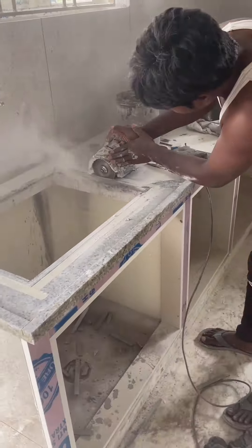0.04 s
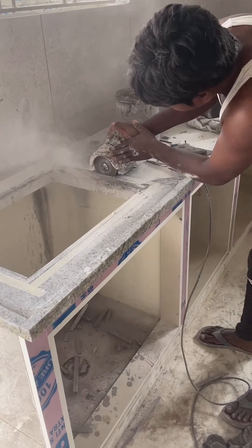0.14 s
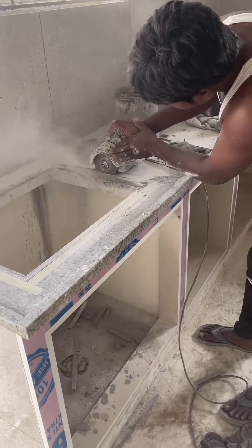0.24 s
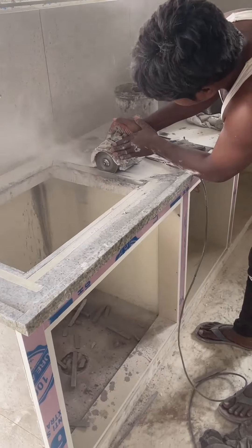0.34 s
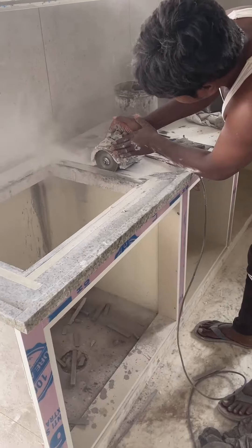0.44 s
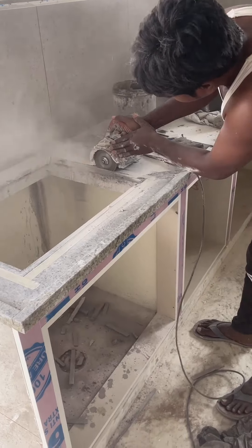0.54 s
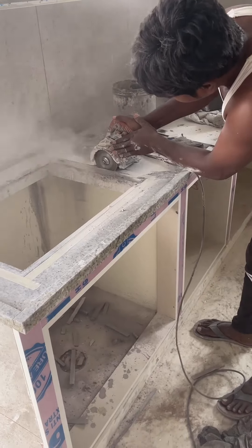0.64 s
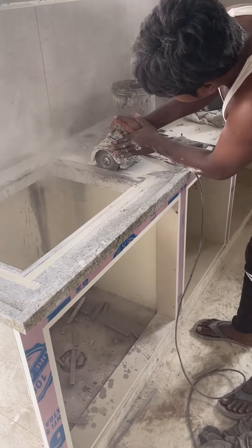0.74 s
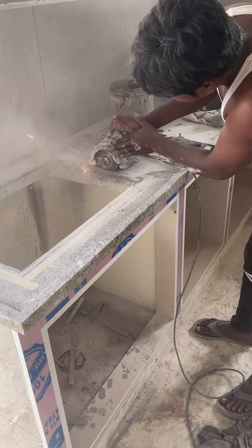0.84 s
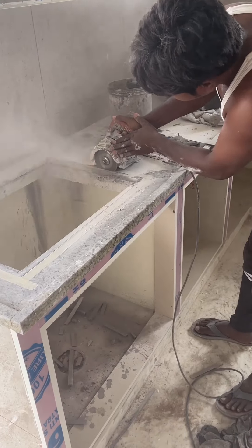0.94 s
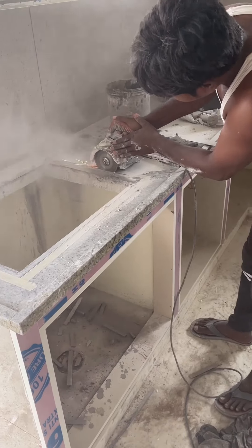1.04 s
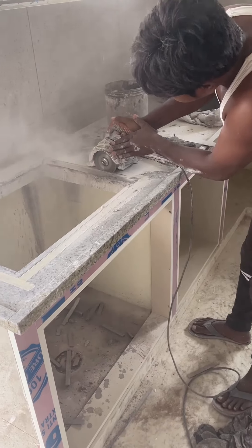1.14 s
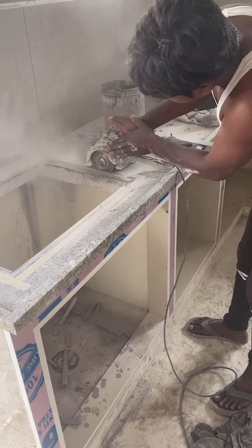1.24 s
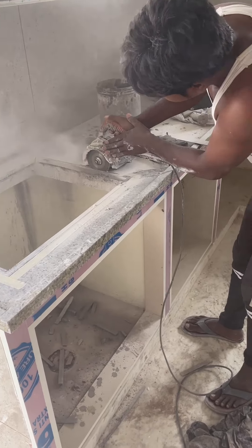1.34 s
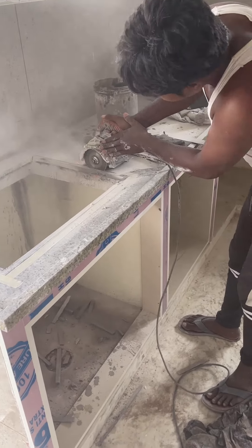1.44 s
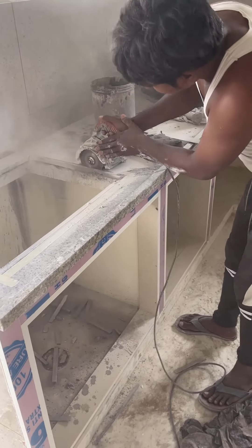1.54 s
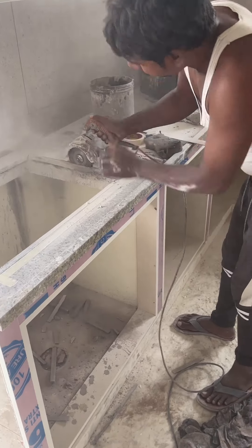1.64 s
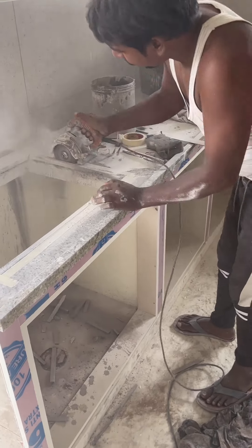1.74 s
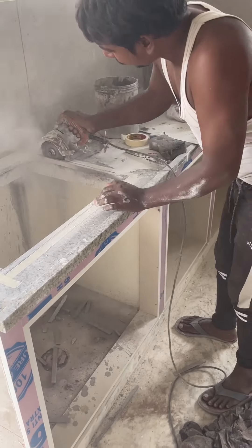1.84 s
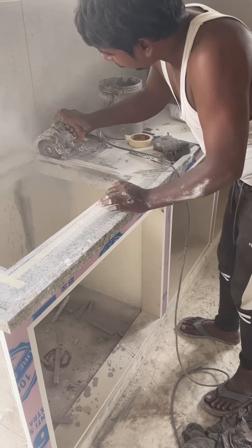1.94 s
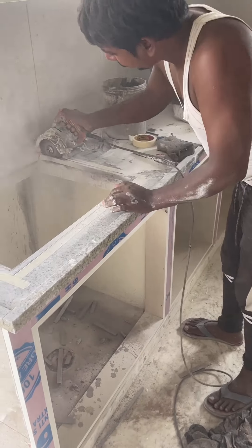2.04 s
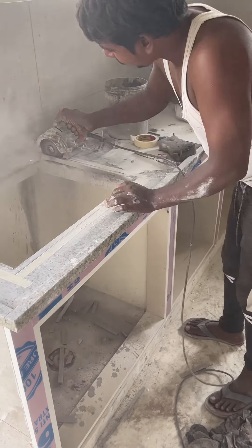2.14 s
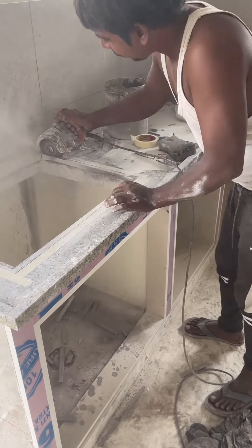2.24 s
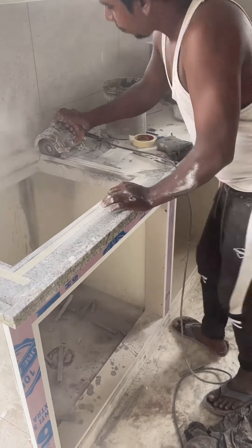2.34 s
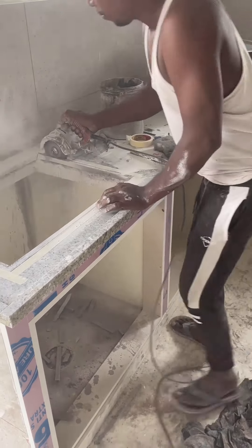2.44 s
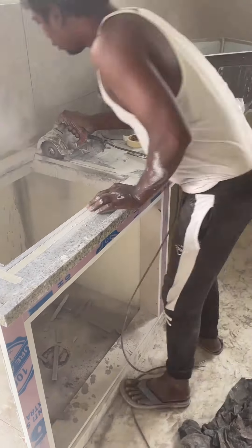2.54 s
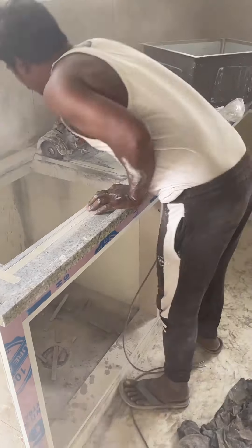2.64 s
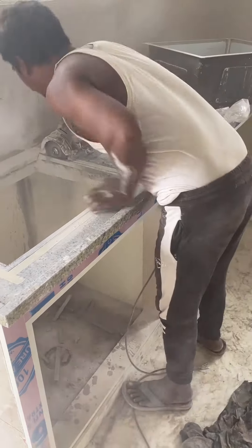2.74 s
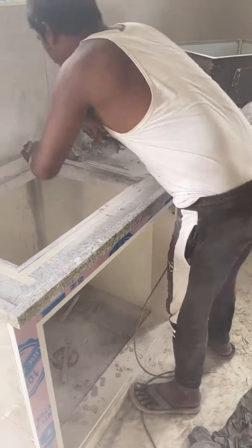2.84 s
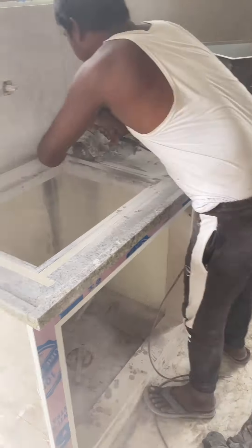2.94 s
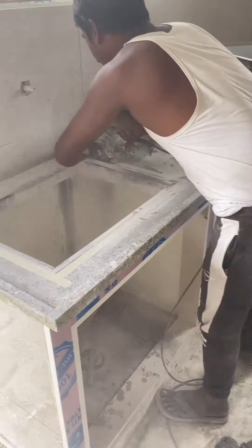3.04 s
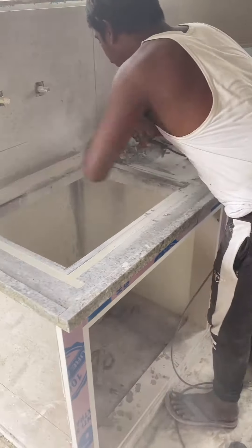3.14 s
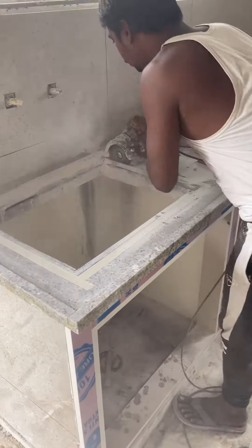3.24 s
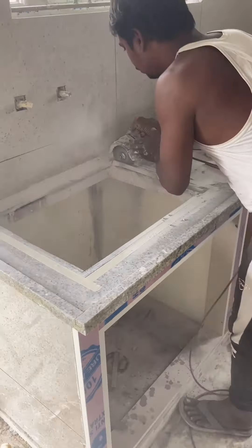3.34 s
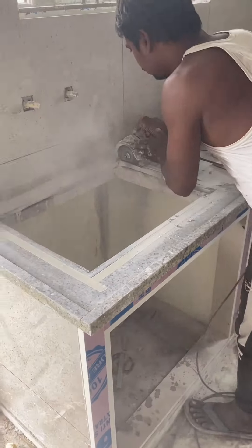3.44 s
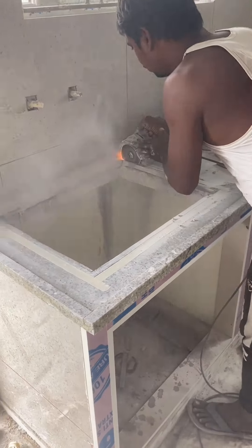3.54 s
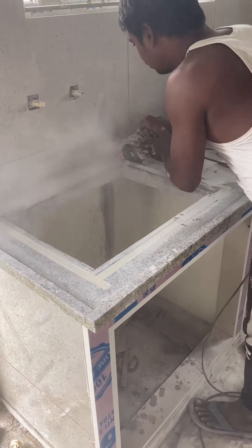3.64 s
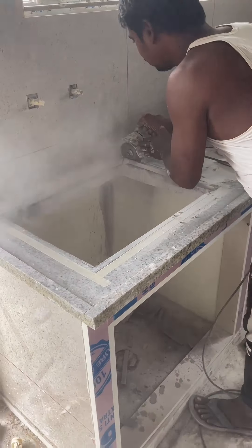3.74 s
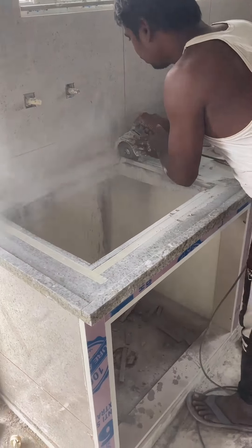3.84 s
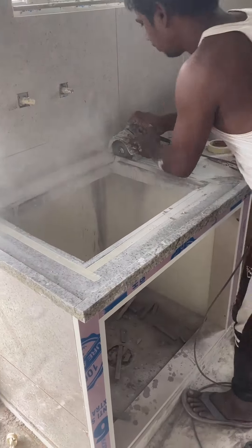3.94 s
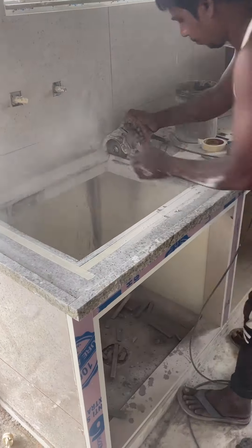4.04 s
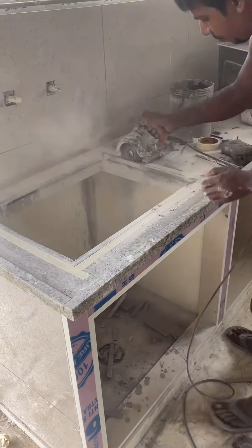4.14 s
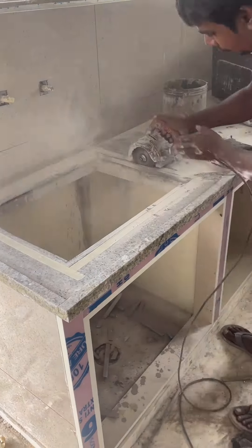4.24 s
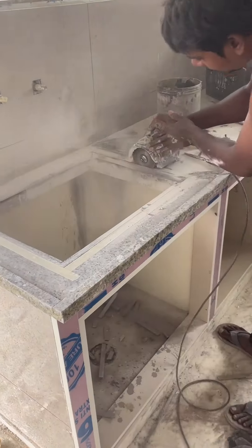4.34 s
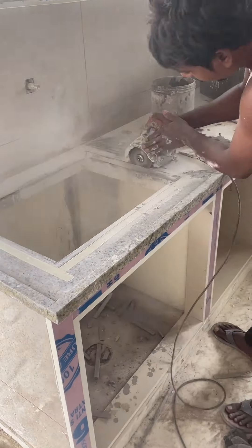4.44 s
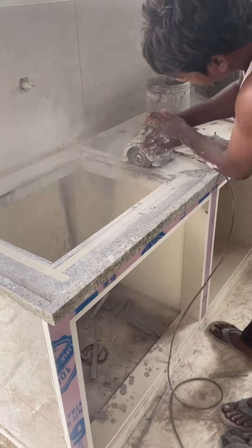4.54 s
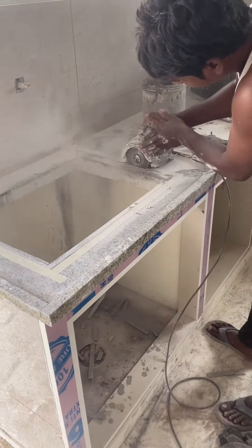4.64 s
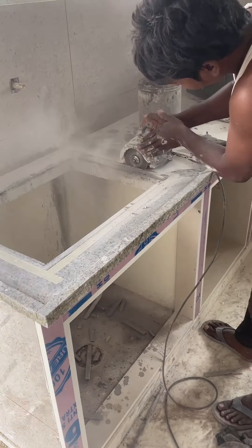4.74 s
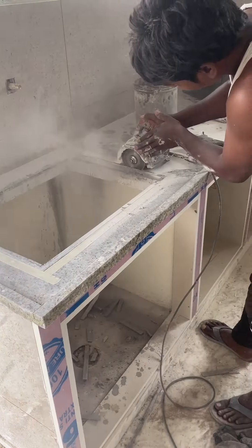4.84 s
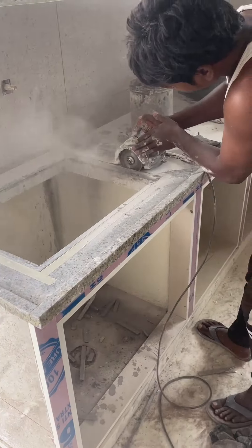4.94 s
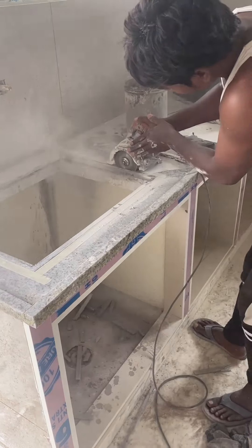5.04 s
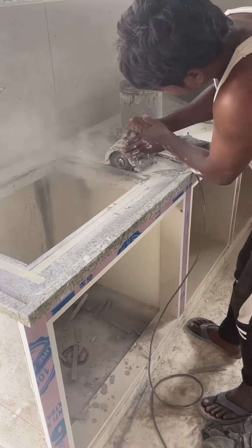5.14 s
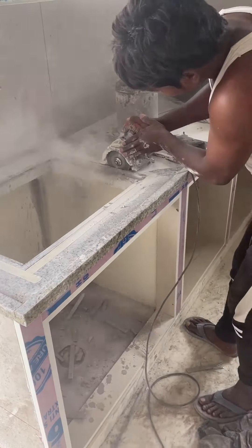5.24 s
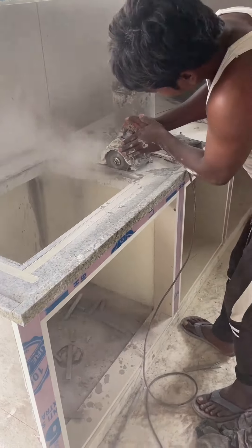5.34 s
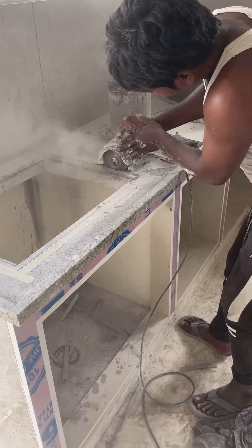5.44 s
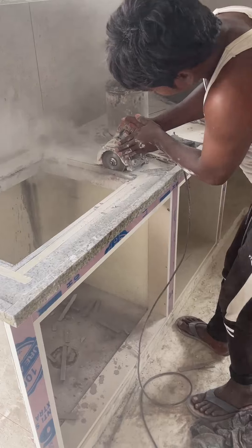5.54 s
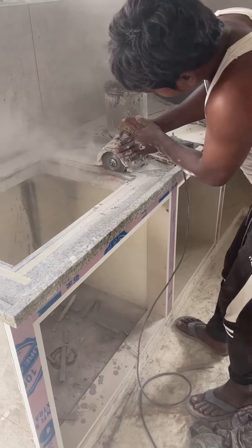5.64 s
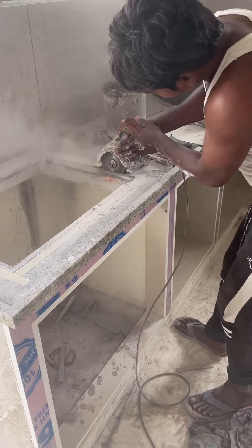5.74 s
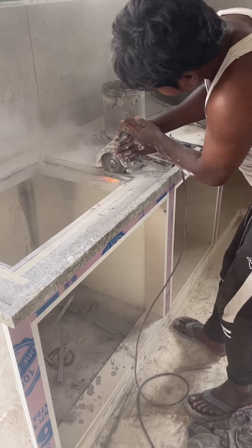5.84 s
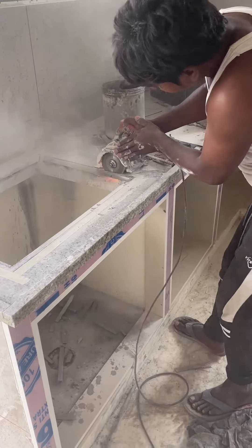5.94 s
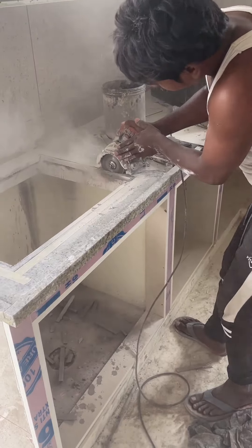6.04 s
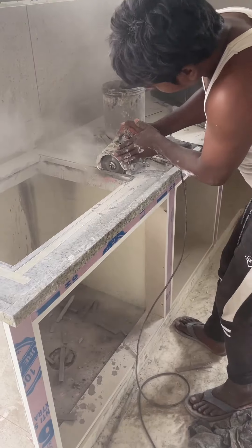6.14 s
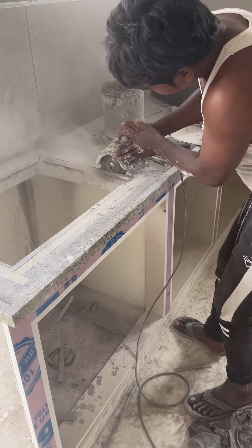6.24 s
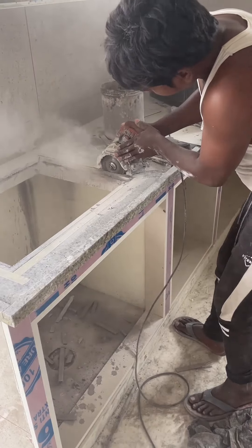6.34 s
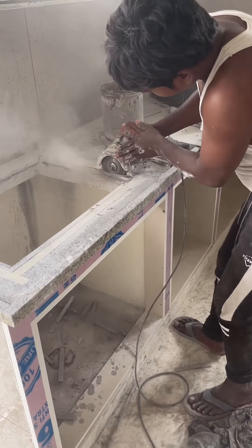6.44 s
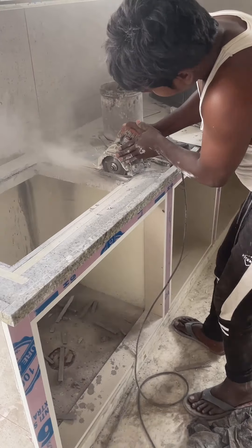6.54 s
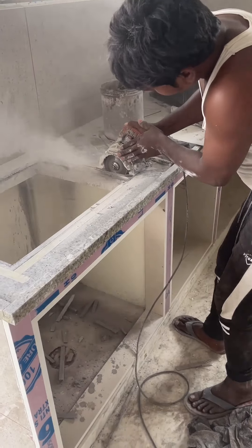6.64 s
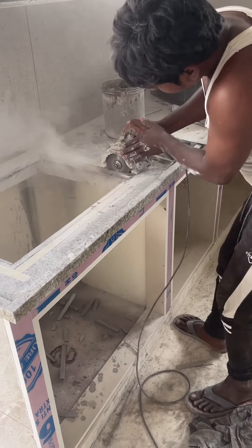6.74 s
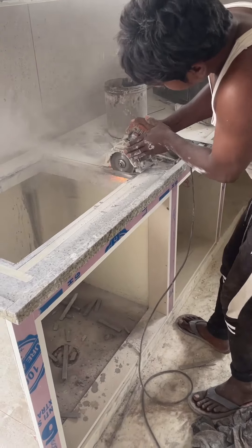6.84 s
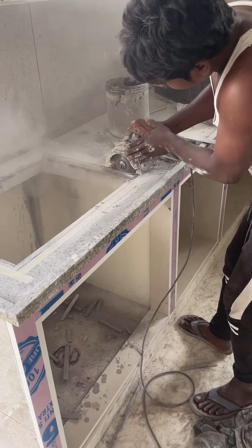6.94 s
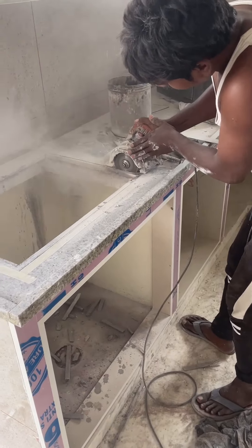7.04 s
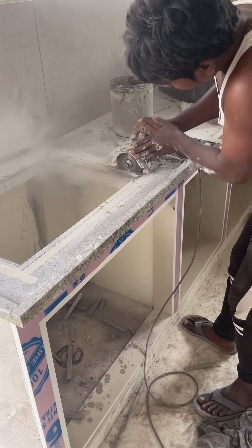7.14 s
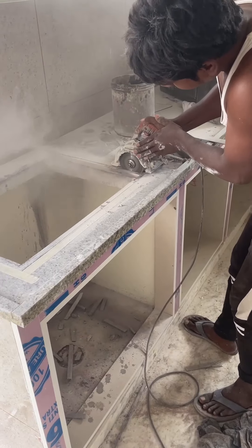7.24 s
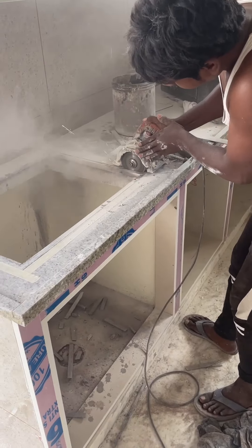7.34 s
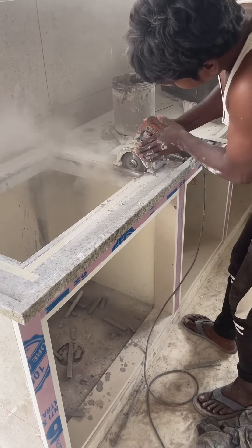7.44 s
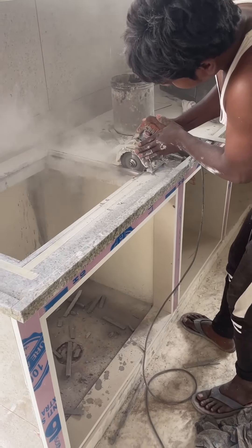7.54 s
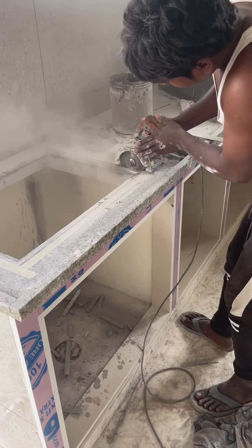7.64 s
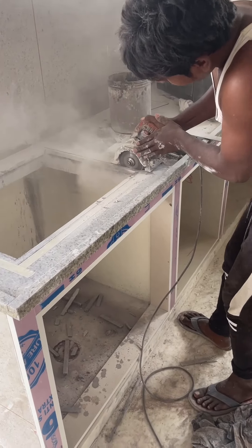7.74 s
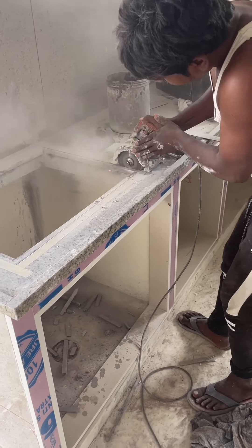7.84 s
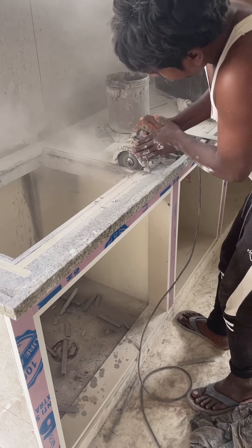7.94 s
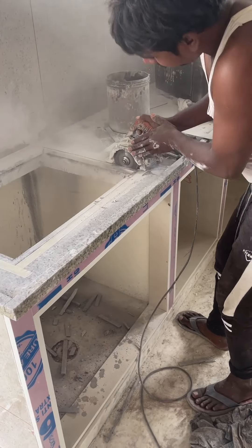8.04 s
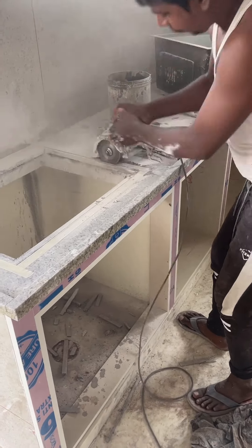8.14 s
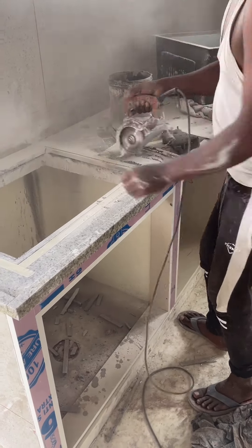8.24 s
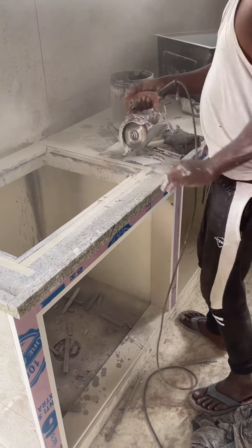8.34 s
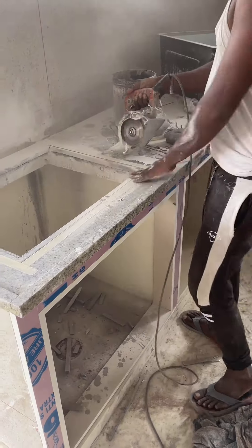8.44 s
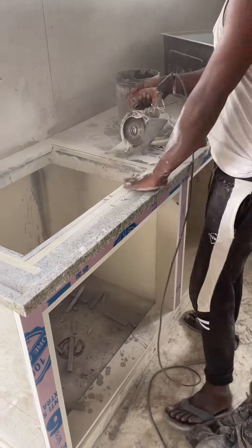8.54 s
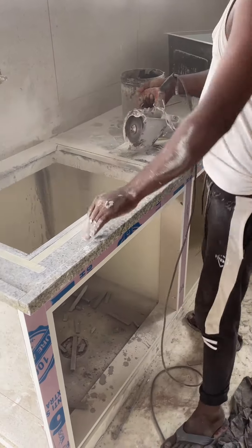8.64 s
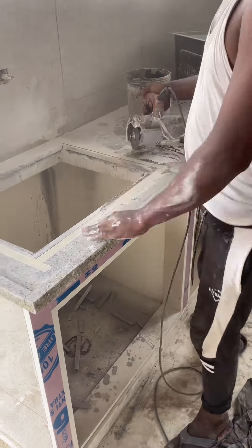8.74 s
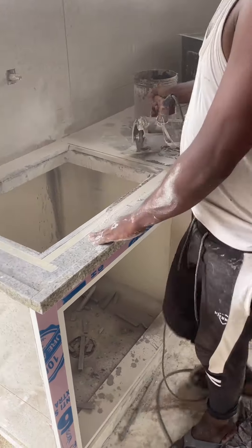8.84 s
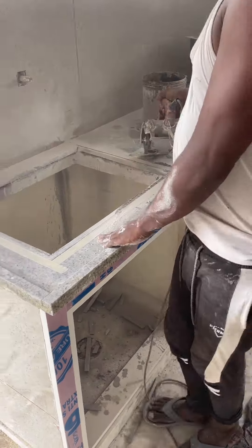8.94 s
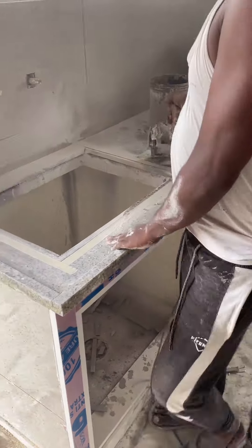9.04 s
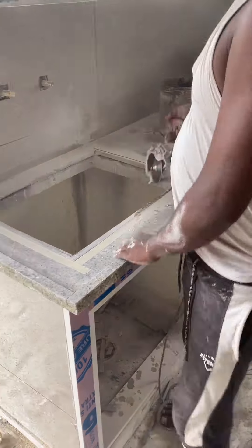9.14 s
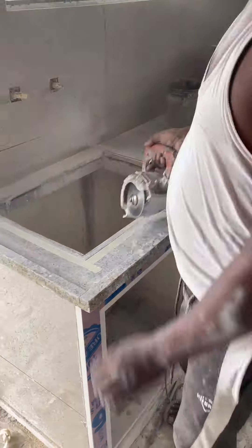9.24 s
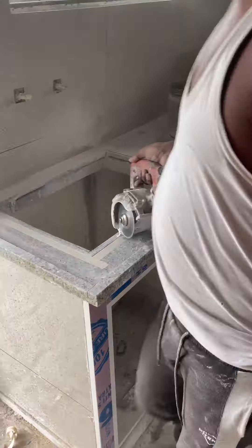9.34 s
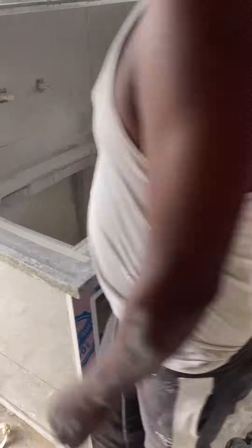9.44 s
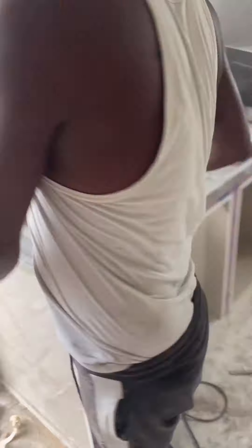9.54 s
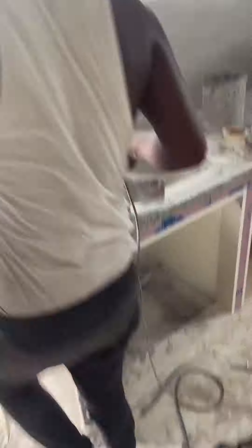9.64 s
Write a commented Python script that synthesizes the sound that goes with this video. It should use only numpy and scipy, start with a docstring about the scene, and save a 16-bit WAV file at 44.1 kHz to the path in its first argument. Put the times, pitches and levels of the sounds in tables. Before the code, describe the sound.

Close to the microphone, a steel blade grinds a stone worktop: bright sizzle, coarse grit noise and a chattering motor buzz. A brief wind-down interrupts it, then power jerks back and short passes follow, with clusters of dull slab knocks, gear whine and metallic ringing. After lifting off at about eight seconds, the motor whirs downward and a faint soft step follows in the bare room.

```python
"""A blade already biting stone: gritty hiss and motor buzz from a handheld electric cutter in a bare room.
One armature rotation drives buzz, hum, gear whine and grit noise; load on the blade pulls its pitch down.
The steel disc sizzles, rings and squeals as filtered noise and tones; chips knock as short falling thuds.
The trigger is let go briefly between two passes; at the end the motor coasts down.
Cutter and disc sound close and dry; the bare walls answer the low buzz and the knocks."""
import sys
import numpy as np
from scipy import signal
from scipy.fft import rfft, irfft, next_fast_len
from scipy.io import wavfile
from scipy.ndimage import uniform_filter1d

SR = 44100
rng = np.random.default_rng(int(sys.argv[2]) if len(sys.argv) > 2 else 0)


def master_out(mix):
    """Clip the mix to full scale and print it as 16-bit PCM to the path in sys.argv[1]."""
    frames = np.transpose(np.atleast_2d(mix))
    ceiling = np.clip(frames, -1, 1)
    pcm = np.round(ceiling * 32767).astype(np.int16)
    wavfile.write(sys.argv[1], SR, pcm)


N = 427769
TIME = np.arange(N) / SR   # s
PADDED = next_fast_len(N + SR)
HZ = np.maximum(np.arange(PADDED // 2 + 1) * SR / PADDED, 1)
WORKING_HZ = 423.5   # armature speed in an ordinary cut; slower means that the blade is pressed harder
GEAR_RATIO = .39   # blade turns per armature turn
LIFT_OUT_S = 8.18   # the disc leaves the kerf for good

# the trigger is let go: from t/s, until t/s
RELEASES = [(2.32, 3.16), (8.08, 9.8)]


def trigger():
    """True while the motor has power."""
    return ~np.any([(TIME > off) & (TIME < on) for off, on in RELEASES], axis=0)


FREE_HZ, SPIN_UP_S = 540.9, .085   # armature speed with no load, and how fast it is regained
FAN_DRAG_PER_TURN, FRICTION_HZ_PER_S = .0019, 149   # what slows the coasting motor
KERF_DRAG_HZ_PER_S = 75   # extra slowing while the coasting disc still brushes the stone
# speed to which the stone holds the armature, one curve per loading cut: t/s, f/Hz
HELD_SPEED = [
    [(0.0, 397.7), (0.06, 399.7), (0.084, 422), (0.316, 388.6), (0.638, 395), (0.732, 407.6),
     (0.882, 391.4), (1.54, 393.1)],
    [(1.69, 485.4), (1.98, 498.6), (2.2, 496.7), (2.33, 506)],
    [(3.3, 382.7), (3.46, 423), (3.69, 424.3)],
    [(4.12, 495.5), (4.26, 472)],
    [(4.48, 533.4), (4.74, 530), (4.83, 514), (4.89, 493), (4.96, 452), (5.01, 422.6), (5.1, 418),
     (5.17, 426.6), (5.35, 432.8), (5.5, 421.7), (5.59, 404), (5.76, 388.5), (5.82, 364), (5.92, 363.3),
     (6.02, 371.7)],
    [(6.2, 511), (6.28, 509), (6.38, 491.6), (6.57, 442), (6.76, 431), (6.87, 378.3), (6.95, 422.6),
     (7.03, 420.3), (7.13, 453.4), (7.27, 445), (7.38, 433), (7.48, 430), (7.6, 446), (7.66, 433),
     (7.81, 447)],
    [(7.9, 514.4), (7.97, 514.6), (8.03, 495), (8.08, 456)],
]


def armature_speed(size=64):
    """Under power the motor runs up as far as the stone lets it; without, fan drag and friction slow it."""
    t, dt = TIME[::size], size / SR
    curves = [np.interp(t, *np.transpose(curve), left=np.inf, right=np.inf) for curve in HELD_SPEED]
    limit = np.min(curves, axis=0)
    friction = FRICTION_HZ_PER_S + KERF_DRAG_HZ_PER_S * (t < LIFT_OUT_S)
    hz, speeds = WORKING_HZ, []
    for powered, held, drag in zip(trigger()[::size].tolist(), limit.tolist(), friction.tolist()):
        if powered:
            change = (FREE_HZ - hz) / SPIN_UP_S
        else:
            change = -FAN_DRAG_PER_TURN * hz ** 2 - drag
        hz = max(min(hz + change * dt, held), 1)
        speeds.append(hz)
    return np.interp(TIME, t, speeds)


# gain change per Hz of speed lost below the working speed
GRIT_DB_PER_HZ, SIZZLE_DB_PER_HZ, SLAB_DB_PER_HZ, CHATTER_DB_PER_HZ = 0.0031, 0.0196, 0.1056, 0.1024
BRUSHING_GRIT_DB, BRUSHING_SONG_DB = -51.5, -36.5   # the disc idling in the kerf, at working speed
GRIT_SPEED_POWER, SONG_SPEED_POWER = 3.24, 1.43   # both grow as a power of speed
CHATTER_GROWTH_DB_PER_S = 3.5   # a bout builds up as it goes on
# the blade is pushed into the stone, gains before the pressure tilt:
# start t/s, end t/s, grit hiss level/dB, disc sizzle level/dB, slab rumble level/dB
CUTS = [(-.1, 0.723, -37.5, -35, -73), (0.724, 1.21, -37, -36, -69), (1.23, 1.571, -36.5, -37, -59.5),
        (1.678, 1.987, -43.5, -29.5, -76), (2, 2.329, -41, -32.5, -72), (2.398, 2.49, -44, -36, -78),
        (3.307, 3.56, -38, -28, -62), (3.572, 3.777, -36, -27.5, -59.5), (4.141, 4.226, -33.5, -27, -58),
        (4.345, 4.955, -36.5, -30.5, -56.5), (4.96, 5.602, -35, -33.5, -53.5),
        (5.615, 6.039, -36.5, -36.5, -59.5), (6.058, 6.908, -37.5, -32, -60),
        (6.939, 7.231, -38, -30.5, -63), (7.224, 7.826, -37.5, -32, -57.5), (7.842, 7.969, -41, -24.5, -62),
        (8.084, 8.168, -39.5, -32, -68)]
# the gears whine when the load is steady: start t/s, end t/s, level/dB
WHINES = [(4.43, 4.8, -47), (4.798, 4.966, -49), (5.015, 5.527, -54), (6.182, 6.403, -54),
          (6.547, 6.777, -53), (6.949, 7.236, -57), (7.248, 7.8, -52.5)]
# bouts of blade chatter, before growth and pressure tilt: start t/s, end t/s, level/dB
CHATTERS = [(0.14, 0.685, -48.5), (0.682, 0.83, -57.5), (0.832, 1.531, -46), (3.597, 3.712, -50),
            (5.123, 6.032, -46.5), (6.824, 6.904, -56)]


def contact(speed):
    """Gains of grit, sizzle, slab, whine and chatter: each cut has its own, and pressure tilts all but whine."""
    lost_hz = np.minimum(WORKING_HZ - speed, 80)
    grit, sizzle, slab = sum(from_db(levels)[:, None] * during(start, end) for start, end, *levels in CUTS)
    whine = sum(from_db(db) * during(start, end) for start, end, db in WHINES)
    chatter = 0
    for start, end, db in CHATTERS:
        growth_db = CHATTER_GROWTH_DB_PER_S * (np.clip(TIME, start, end) - start)
        chatter = chatter + during(start, end) * from_db(db + growth_db)
    in_kerf, pace = during(-1, LIFT_OUT_S), speed / WORKING_HZ
    brushing_grit = in_kerf * from_db(BRUSHING_GRIT_DB) * pace ** GRIT_SPEED_POWER
    brushing_song = in_kerf * from_db(BRUSHING_SONG_DB) * pace ** SONG_SPEED_POWER
    grit = np.hypot(grit * from_db(GRIT_DB_PER_HZ * lost_hz), brushing_grit)
    sizzle = np.hypot(sizzle * from_db(SIZZLE_DB_PER_HZ * lost_hz), brushing_song)
    slab = slab * from_db(SLAB_DB_PER_HZ * lost_hz)
    return grit, sizzle, slab, whine, chatter * from_db(CHATTER_DB_PER_HZ * lost_hz)


# harmonics of the armature, levels within each set: multiple, level/dB
CHATTER_ORDERS = [(2, -.5), (3, -5), (4, -2.5), (5, -7.5)]
SHUDDER_ORDERS = [(1, -0.36), (2, 1)]
WHINE_ORDERS = [(2, -28), (8, -6), (9, -2), (10, -14)]
IDLE_ORDERS = [(1, -9), (2, 0), (3, -7), (4, 0)]
# upper harmonics of the chatter, radiated by the blade guard: multiple, level/dB
RASP_ORDERS = [(6, 1.5), (8, 0.5), (9, 0.5), (10, -1), (11, -3), (12, 0.5), (13, 1.5), (14, -1), (24, 1)]
# resonances of worktop, gear case, motor housing, and those the hum passes through: f/Hz, width/Hz, lift/dB
SLAB_MODES = [(381.4, 33, 11.5), (725, 89, 3), (870, 120, 5.5), (1180, 305, 14.5)]
GEAR_MODES = [(3830, 220, 9.5)]
HOUSING_MODES = [(1440, 110, 3.4), (2140, 30, 2.5), (3640, 170, 2.4)]
HUM_MODES = [(398, 60, 12.5), (623, 290, 12), (1030, 160, 5), (1480, 200, -2.5), (2180, 73, 8)]
# relative spectrum of the rush from the housing: f/Hz, level/dB
HOUSING = [(100, -60), (300, -65), (600, -11.5), (850, -4), (1080, -5.5), (1400, -4.5), (1700, -0.5),
           (2100, 3), (2450, -1), (2900, -4), (3400, -2), (6000, -8)]


def motor(angle, speed, whine_gain, chatter_gain):
    """Chatter buzz, gear whine, hum and fan rush; each harmonic swells as it crosses a resonance."""
    # the blade catches a little early or late, which blurs the upper harmonics
    slip = .06 * drift(60)
    buzz = from_db(-11.5) * chatter_gain * harmonics(angle + slip, CHATTER_ORDERS, rough=0.7, rough_rate=39)
    rasp_tones = harmonics(angle + .5 * slip, RASP_ORDERS, rough=0.96, rough_rate=18)
    rasp = from_db(-6.0) * chatter_gain * rasp_tones
    # the slab follows the beat evenly
    shudder = from_db(-17.5) * chatter_gain * harmonics(angle, SHUDDER_ORDERS, rough=0.17, rough_rate=13)
    whine = whine_gain * harmonics(angle, WHINE_ORDERS, rough=.6, rough_rate=18)
    # the slab passes the hum on, most when the tool rests on it
    in_kerf_db = 6 * during(-1, LIFT_OUT_S) + 1.8 * during(*RELEASES[0])
    hum_gain = from_db(-82.0 + in_kerf_db + 2 * drift(5)) * dies_below(speed, knee_hz=266, steepness=8.3)
    hum = hum_gain * harmonics(angle, IDLE_ORDERS, rough=0.93, rough_rate=27)
    tones = room(resonate(buzz, SLAB_MODES), wet_db=-3, t60=0.33) + rasp
    tones = tones + resonate(whine, GEAR_MODES) + resonate(hum, HUM_MODES)
    fan = from_db(-53.5) * dies_below(speed, knee_hz=236, steepness=5.2)
    rattle = from_db(-8 + 5.5 * drift(81)) * chatter_gain   # chatter also rattles the housing
    rush = np.hypot(fan, rattle) * colour(rim(angle, repeat=0.41), HOUSING)
    return tones + resonate(shudder, SLAB_MODES) + resonate(rush, HOUSING_MODES)


# relative spectra of grit, slab, and disc deep in the kerf or only brushing: f/Hz, level/dB
GRIT = [(100, -71), (500, -51), (820, -17.5), (1400, -15), (1510, -11.5), (1670, -19.5), (2270, -10),
        (2660, -8), (3910, -3.5), (4400, -3.5), (4960, -3.5), (7020, -5), (8590, -1.5), (10700, -1),
        (12500, -6), (16200, -61), (22000, -120)]
SLAB = [(40, -72), (80, -72), (150, -27), (260, -8.5), (380, 5.5), (560, 1), (820, 15), (1050, 7.5),
        (1500, 5), (2200, 4.5), (3500, -25)]
DISC_LOADED = [(6760, -46), (9000, -16), (11500, 4), (12600, 10), (13600, 6.5), (14700, 15), (15500, 6.5),
               (16000, -1)]
DISC_FREE = [(6760, -52), (11000, 1.5), (12000, 1.5), (12700, 8), (13500, 7), (14100, 15), (14700, -7),
             (15500, 4.5), (16000, 6)]


def grinding(angle, grit_gain, disc_gain, slab_gain, chatter_gain):
    """Diamonds tear out grains in bursts that follow the rotation; slab and disc ring with them."""
    chatter = np.clip(chatter_gain / from_db(-49.0), 0, 1)
    armature_beat_db = 0.66 * chatter * np.cos(angle)
    blade_beat_db = 0.11 * np.cos(GEAR_RATIO * angle)
    bursts = from_db(armature_beat_db + blade_beat_db + 0.89 * drift(170))
    feed = from_db(0.78 * drift(14.6) + 0.16 * drift(2.8))   # the hand never pushes quite evenly
    scrape = rim(angle, repeat=.5) * bursts
    grit = grit_gain * feed * colour(scrape, GRIT)
    slab = slab_gain * from_db(8.0 + 2.4 * drift(28)) * colour(white() * bursts, SLAB)
    # deep in the kerf the disc hisses broadly; brushing the stone, it sings in a narrow band
    load = np.clip((to_db(grit_gain) - to_db(disc_gain) + 11.0) / 4, 0, 1)
    sizzle, song = rim(angle, repeat=.65), rim(angle, repeat=.9)
    held = np.sqrt(load) * colour(sizzle * bursts, DISC_LOADED)
    free = np.sqrt(1 - load) * colour(song, DISC_FREE) * from_db(1.5 * drift(45) + drift(5.8))
    disc = from_db(0.2) * (held + free) + from_db(1.0) * disc_song()
    return grit + slab + disc_gain * feed * disc


# modes in which the disc sings, before the grip bends them: f/Hz, width/Hz, level/dB
SONG_MODES = [(8070, 460, -24), (9100, 300, -28), (12620, 300, -11.5), (13400, 410, -6),
              (15300, 400, -11.5)]
# the modes stiffen as the kerf grips the disc: t/s, pitch factor
GRIP = [(0, 1.04), (2.0, 1.0), (3.1, 0.99), (3.5, 1), (4.5, 1.023), (8.1, 1.025)]


def disc_song(wander=0.003, swell_db=3.1, skew=1.04):
    """Narrow bands of upper disc modes; each wanders and swells alone, the two sides out of step (skew in rad)."""
    grip, out = in_time(GRIP)[0], 0
    for hz, width_hz, db in SONG_MODES:
        a, b = signal.sosfilt(signal.butter(2, width_hz / 2, fs=SR, output="sos"), white())
        phase = 2 * np.pi * np.cumsum(hz * grip * (1 + wander * drift(2.5))) / SR
        band = (rms_one(a) + 1j * rms_one(b)) * np.exp(1j * phase)
        out = out + from_db(db + swell_db * drift(8.1)) * band
    return np.array([out.real, (out * np.exp(-1j * skew)).real])


DISC_T60_S, RING_RISE_S, RING_FALL_S = 0.8, 0.004, .009
# a low mode of the disc sounds, rubbed by the kerf or, in the last row, ringing on as the disc lifts out:
# start t/s, end t/s, f/Hz, level/dB
RINGS = [(0, 0.1, 830, -54), (0.125, 0.177, 827, -40), (1.53, 1.66, 880, -60), (2.47, 2.554, 887, -60),
         (3.17, 3.28, 880, -61), (3.585, 3.618, 881, -41), (3.645, 3.67, 875, -47),
         (4.069, 4.155, 880, -53), (4.985, 5.09, 858, -41.5), (5.109, 5.33, 868, -46),
         (5.333, 5.577, 853, -43.5), (6.135, 6.36, 1520, -48), (6.855, 6.905, 1500, -48),
         (7.879, 7.98, 1518, -57.5), (8.095, 8.173, 889, -54.5), (8.164, 8.34, 889, -67)]


def disc_ring(after_ring_db=-17):
    """A low mode of the disc is held for each row, then rings on faintly and cleanly."""
    shake, wander, out = 1 + .22 * drift(30), .3 * drift(15), 0
    for start, end, hz, db in RINGS:
        held = during(start, end, RING_RISE_S, RING_FALL_S)
        tail = from_db(after_ring_db - 60 * np.abs(TIME - end) / DISC_T60_S) * during(end, np.inf)
        out = out + from_db(db) * (held * shake + tail) * np.sin(2 * np.pi * hz * TIME + wander)
    return out


# under a light load the gear-tooth beat sets the disc squealing: start t/s, end t/s, level/dB
SQUEALS = [(1.95, 2.24, -33), (7.91, 7.977, -37)]
# partials of the squeal: multiple of the armature speed, relative level/dB
SQUEAL_ORDERS = [(9, -18.5), (18, -10), (27, 4)]


def squeal(angle):
    """The lightly loaded disc locks on to the beat of the gear teeth."""
    gain = sum(from_db(db) * during(start, end) for start, end, db in SQUEALS)
    return gain * harmonics(angle, SQUEAL_ORDERS, rough=0.67, rough_rate=30)


# relative spectrum of the rubbing brushes: f/Hz, level/dB
BRUSH_HISS = [(100, -47), (500, -11.5), (1200, -8.5), (3000, -5), (6000, 0.5), (9000, -2.5), (13000, 3.5),
              (15000, -29)]
# armature slots and commutator bars passing the brushes: multiple, relative level/dB
COMMUTATOR_ORDERS = [(12, -7), (24, -5), (48, 5), (72, -6)]
# resonances of the brush holder: f/Hz, width/Hz, lift/dB
BRUSH_MODES = [(4300, 500, 6), (5522, 670, 10)]


def brushes(angle, speed):
    """Carbon brushes rub and, under power, spark; the passing bars whistle down as the motor slows."""
    rub = dies_below(speed, knee_hz=81, steepness=5.5) * np.sqrt(speed / WORKING_HZ)
    sparks = from_db(-53.0) * uniform_filter1d(trigger() * 1., size=900) * colour(white(), GRIT)
    whistle = resonate(harmonics(angle, COMMUTATOR_ORDERS, rough=1.0, rough_rate=60), BRUSH_MODES)
    whistle = whistle * dies_below(speed, knee_hz=111, steepness=14)
    hiss = from_db(-57.5) * colour(white(), BRUSH_HISS)
    return rub * (hiss + from_db(-72.5) * whistle) + sparks


def kick(attack_s=0.0099, decay_s=0.054):
    """When power returns the motor jerks: a burst of sparks, and the disc is flicked against the kerf."""
    after = np.maximum(TIME - RELEASES[0][1], 0)
    jerk = (1 - np.exp(-after / attack_s)) * np.exp(-after / decay_s)
    sparks = from_db(-40.0) * colour(white(), GRIT)
    flick = from_db(-28.0) * colour(white(), DISC_LOADED)
    return jerk * (sparks + flick)


# disc and housing ring while the armature coasts: f/Hz, width/Hz, level/dB
COAST_MODES = [(880, 5.97, -75.5), (1366, 7.8, -74.5), (1450, 14, -76), (1810, 26, -73), (1985, 17, -69),
               (2090, 250, -69), (2120, 13, -67), (2290, 27, -74), (2396, 20, -80), (2700, 20, -85)]


def coasting_ring(angle, speed, loose=0.8):
    """With power off the slack gears tap once a turn; a mode swells as a harmonic of the taps falls through it."""
    slack = uniform_filter1d(1. - trigger(), size=6000) * dies_below(speed, knee_hz=173, steepness=5)
    taps = rms_one(np.diff(angle // (2 * np.pi), prepend=0)) * (1 + .5 * drift(60))
    drive = taps + loose * white()
    ring = 0
    for hz, width_hz, db in COAST_MODES:
        mode = signal.lfilter(*signal.iirpeak(hz, hz / width_hz, fs=SR), drive)
        ring = ring + from_db(db) * rms_one(mode)
    return slack * ring


def thud(dull_hz, low_hz=140, boom_hz=195, boom=0.68, lag_hz=330, size=8192):
    """Bending waves carry highs faster than lows: a short falling thud ending in the slab's lowest mode; peak 1."""
    hz = np.arange(size // 2 + 1) * SR / size
    spread = ((lag_hz - 1j * hz) / (lag_hz + 1j * hz)) ** 4   # all-pass that delays the lows
    wave = irfft(spread / (1 + 1j * hz / dull_hz), size)[:size // 2]
    wave = signal.sosfilt(signal.butter(4, low_hz, "high", fs=SR, output="sos"), wave)
    wave = wave + boom * signal.lfilter(*signal.iirpeak(boom_hz, 2, fs=SR), wave)
    return wave / np.abs(wave).max()


# big chips knock the slab, before the common knock_db; sharper blows reach higher:
# t/s, peak level/dB, dull above f/Hz
KNOCKS = [(3.324, -33, 300), (3.335, -38, 200), (3.349, -36, 350), (3.364, -45, 300), (3.378, -41, 900),
          (3.397, -41, 350), (3.414, -43, 350), (3.441, -45, 450), (3.462, -38, 397), (3.491, -45, 400),
          (3.51, -45, 500), (3.66, -40, 500), (3.692, -45, 400), (3.722, -40, 453), (3.753, -50, 600),
          (4.175, -35, 400), (4.193, -36, 450), (6.164, -47, 400), (6.213, -47, 301), (6.268, -36, 600),
          (6.284, -26, 279), (6.304, -29, 200), (6.314, -35, 300), (6.356, -26, 400), (6.392, -37, 500),
          (6.409, -25, 1200), (6.414, -35.5, 300), (6.42, -25, 906), (6.43, -39.5, 400), (6.48, -43, 500),
          (6.498, -49, 400), (6.53, -36, 600), (6.553, -39, 280), (6.608, -35, 500), (6.629, -41, 400),
          (6.67, -37, 450), (6.701, -40, 500), (6.734, -41, 700), (6.757, -47, 500), (6.77, -45, 400),
          (6.801, -49, 699), (6.842, -46, 900)]
# showers of fine chips, before the common chip_db: t/s, size level/dB, rise t/s, fall t/s
SHOWERS = [(3.345, -46, 0.03, 0.11), (3.7, -59, 0.021, 0.02), (4.19, -53.5, 0.037, 0.013),
           (4.88, -67, 0.4, 0.074), (5.85, -59, 0.11, 0.17), (6.3, -45, 0.17, 0.1), (6.72, -61, 0.2, 0.24)]


def knocks(knock_db=4, chip_db=8, chip_dull_hz=300, chips_per_s=300):
    """Big chips knock one by one amid showers of fine ones, each a thud in the slab."""
    chips = (rng.random(N) < chips_per_s / SR) * rng.standard_normal(N)
    shower = 0
    for at, size_db, rise, fall in SHOWERS:
        shower = shower + from_db(size_db) * np.exp(-np.maximum((at - TIME) / rise, (TIME - at) / fall))
    out = from_db(chip_db) * signal.fftconvolve(chips * shower, thud(chip_dull_hz))[:N]
    for s, db, dull_hz in KNOCKS:
        wave, first = thud(dull_hz), int(s * SR)
        out[first:first + len(wave)] += from_db(db + knock_db) * wave
    return room(out, wet_db=-9, t60=0.07)


# faint hum in the building, sounded at 0.98 of the listed pitch: nominal f/Hz, level/dB
HUM = [(152, -98), (222, -92.5), (290, -94.5)]
# relative spectra of the soft step and of the quiet air: f/Hz, level/dB
STEP = [(100, -22), (220, -4), (500, 4), (900, -5), (2000, -28)]
BACKGROUND = [(30, -37), (85, -43), (150, -7.5), (230, -6.5), (320, -15.5), (450, -6.5), (900, -10.5),
              (3000, -20)]


def background(step_s=9.32, step_decay_s=0.051):
    """Quiet air and hum of the building, and a soft low step as the worker turns away."""
    hum = 0
    for hz, db in HUM:
        tone = harmonics(2 * np.pi * hz * TIME, [(0.98, 0)], rough=0.25, rough_rate=4.3)
        hum = hum + from_db(db) * tone
    fade = (TIME > step_s) * np.exp(-np.abs(TIME - step_s) / step_decay_s)
    step = from_db(-73.5) * fade * colour(white(), STEP)
    air = from_db(-79.5) * colour(white(), BACKGROUND)
    return hum + step + air


def room(x, wet_db, t60):
    """Direct sound plus the dense echoes of bare walls, partly shared by both sides."""
    t = np.arange(SR // 2) / SR
    shared, left, right = rng.standard_normal((3, len(t))) * from_db(-60 * t / t60) * (t > .003)
    echoes = shared + 0.073 * np.array([left, right])
    echoes /= np.sqrt(np.sum(echoes ** 2, axis=1, keepdims=True))
    wet = from_db(wet_db)
    return (x + wet * signal.fftconvolve(x[None], echoes, axes=1)[:, :N]) / np.sqrt(1 + wet ** 2)


def harmonics(angle, orders, rough, rough_rate):
    """Multiples of the rotation, each shaken in strength and phase; rms 1."""
    total = 0
    for k, db in orders:
        in_step = (1 + rough * drift(rough_rate)) * np.sin(k * angle)
        out_of_step = rough * drift(rough_rate) * np.cos(k * angle)
        total = total + from_db(db) * (in_step + out_of_step)
    return rms_one(total)


def rim(angle, repeat, order=100, size=4096):
    """The rough rim comes round every blade turn, so part of its noise repeats as a comb of fine lines."""
    profile = rms_one(irfft(rfft(rng.standard_normal((2, size)))[:, 1:order], size))
    place = GEAR_RATIO * angle / (2 * np.pi) % 1 * size
    return white() + repeat * np.array([np.interp(place, np.arange(size), p) for p in profile])


# left-right likeness of the noises: f/Hz, likeness (1 is the same on both sides)
LIKENESS = [(250, 1), (700, 0.94), (1400, 0.72), (2800, 0.096), (5000, 0.94), (9000, 0.27), (13500, 0.093)]
# upper modes of the steel disc: f/Hz, width/Hz, lift/dB
DISC_MODES = [(4550, 210, -2.5), (5150, 82, -2), (7690, 440, 4), (8630, 280, 5.5), (9450, 240, 4)]


def colour(drive, spectrum):
    """A drive through a spectrum and the disc's modes, in stereo with likeness set over frequency; rms 1."""
    alike = np.clip(across_hz(LIKENESS), 0, 1)
    mid, side = rfft(drive, PADDED)
    sides = np.array([[1], [-1]])
    both = np.sqrt(1 + alike) * mid + np.sqrt(1 - alike) * side * sides
    shape = from_db(across_hz(spectrum) + lift_db(DISC_MODES))
    return rms_one(irfft(both * shape, PADDED)[:, :N])


def resonate(x, modes):
    """Lift a sound at each resonance."""
    return irfft(rfft(x, PADDED) * from_db(lift_db(modes)), PADDED)[..., :N]


def lift_db(modes):
    """Bell-shaped resonances over frequency."""
    return sum(db / (1 + (2 * (HZ - hz) / width) ** 2) for hz, width, db in modes)


ENTRY_S, EXIT_S = 0.025, 0.019   # how fast the blade takes hold and lets go


def during(start, end, entry_s=ENTRY_S, exit_s=EXIT_S):
    """Gain that opens at the start and closes at the end, with soft edges."""
    opening = 1 + np.tanh((TIME - start) / entry_s / 2)
    closing = 1 + np.tanh((end - TIME) / exit_s / 2)
    return opening * closing / 4


def dies_below(speed, knee_hz, steepness):
    """Gain of a running noise that is steady at speed and fades as the motor gets slow."""
    return 1 / (1 + (knee_hz / speed) ** steepness)


def drift(rate):
    """Slow chance with spread 1; a higher rate in Hz moves faster."""
    r = np.exp(-80 * np.pi * rate / SR)   # drawn at every 40th sample
    noise = rng.standard_normal(N // 40 + 2002)
    slow = signal.lfilter([1], [1, -2 * r, r * r], noise)[2000:]
    return np.interp(np.arange(N) / 40, np.arange(len(slow)), rms_one(slow))


def white():
    """Two unrelated white noises."""
    return rng.standard_normal((2, N))


def in_time(rows):
    """Each column of a curve at every sample."""
    s, *columns = np.transpose(rows)
    return [np.interp(TIME, s, c) for c in columns]


def across_hz(points):
    """A table over frequency, joined on a log axis."""
    hz, value = np.transpose(points)
    return np.interp(np.log(HZ), np.log(hz), value)


def from_db(db):
    """Decibels to gain."""
    return 10 ** (np.asarray(db) / 20)


def to_db(gain):
    """Gain to decibels."""
    return 20 * np.log10(gain + 1e-9)


def rms_one(x):
    """Scale to rms 1."""
    return x / np.sqrt(np.mean(x ** 2) + 1e-20)


# the worker shifts his body: t/s, left minus right level/dB
PAN = [(0.0, .5), (2.2, 0.9), (3.1, -0.2), (3.8, -0.1), (4.6, 1), (5.2, 0.7), (8.2, 0.5)]


def scene():
    """One spinning armature drives the motor tones and the grinding; knocks and room air stay unpanned."""
    speed = armature_speed() * (1 + 0.002907 * drift(19.46))
    angle = 2 * np.pi * np.cumsum(speed) / SR
    grit, sizzle, slab, whine, chatter = contact(speed)
    cutter = motor(angle, speed, whine, chatter) + grinding(angle, grit, sizzle, slab, chatter)
    cutter = cutter + disc_ring() + squeal(angle)
    cutter = cutter + brushes(angle, speed) + kick() + coasting_ring(angle, speed)
    pan = from_db(in_time(PAN)[0] * np.array([[.5], [-.5]]))
    return cutter * pan + knocks() + background()


CUTOFF_HZ = 15850


def record(dry):
    """The microphone drops the deep bass; the top is cut steeply."""
    thin = signal.sosfilt(signal.butter(2, 75, "high", fs=SR, output="sos"), dry)
    return signal.sosfilt(signal.ellip(12, .1, 80, CUTOFF_HZ, fs=SR, output="sos"), thin)


dry = scene()
out = record(dry)
master_out(out)
```